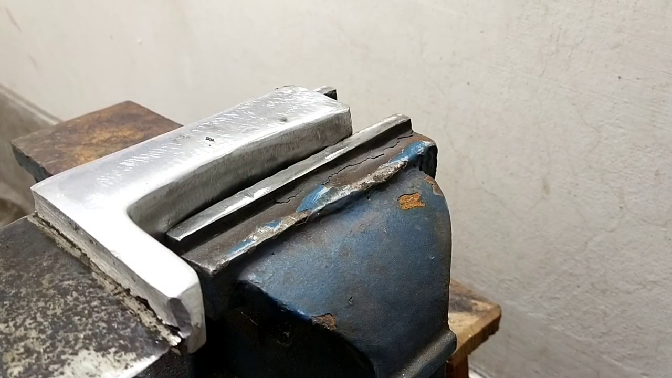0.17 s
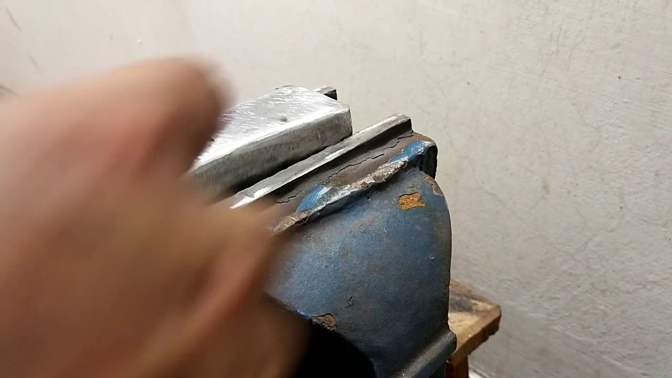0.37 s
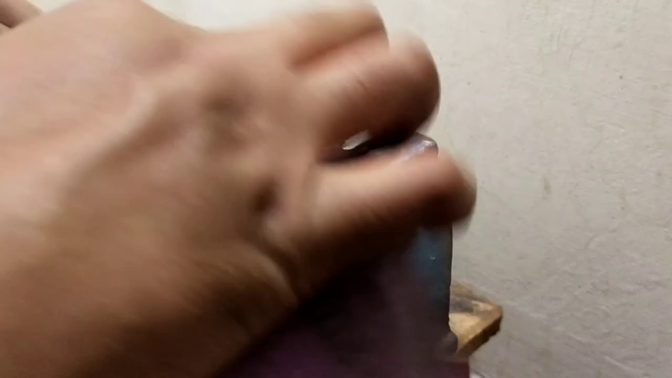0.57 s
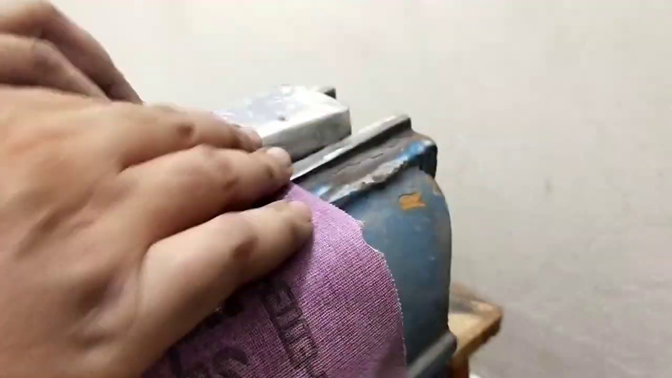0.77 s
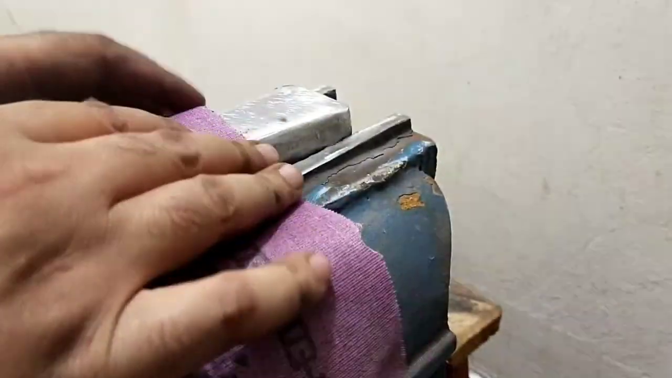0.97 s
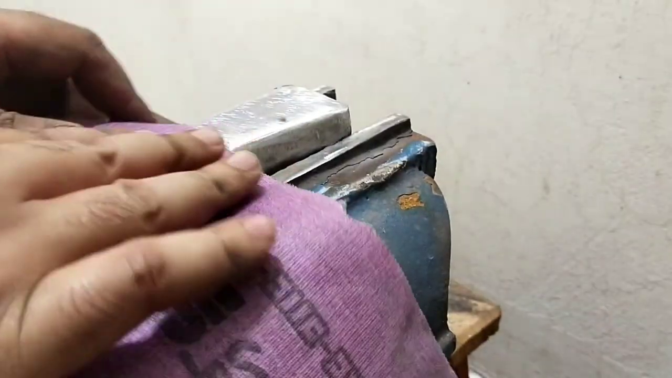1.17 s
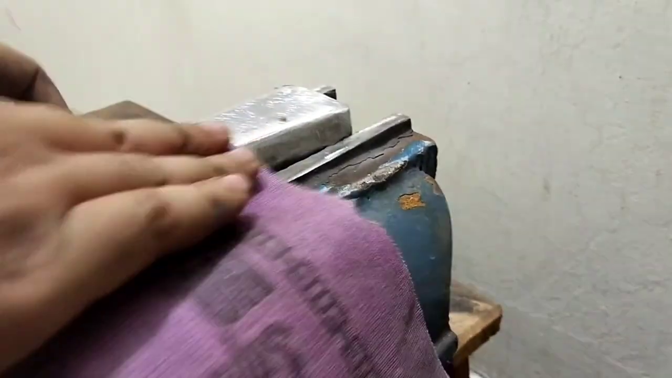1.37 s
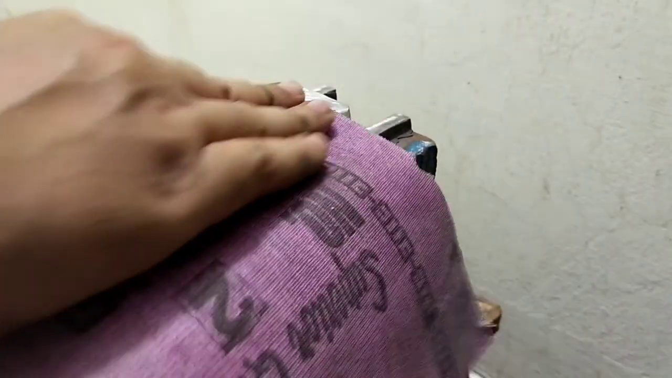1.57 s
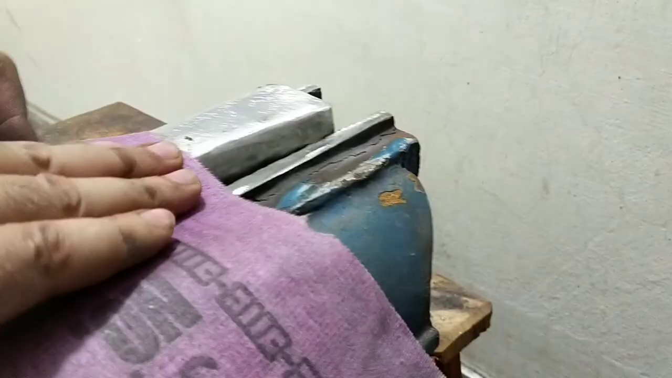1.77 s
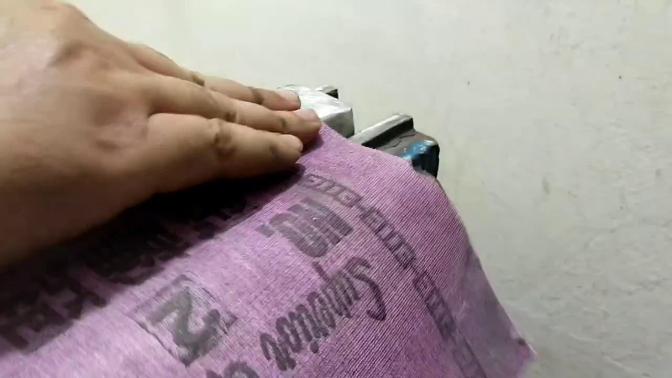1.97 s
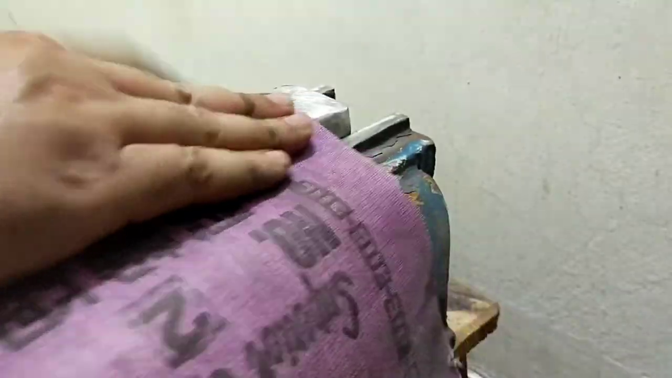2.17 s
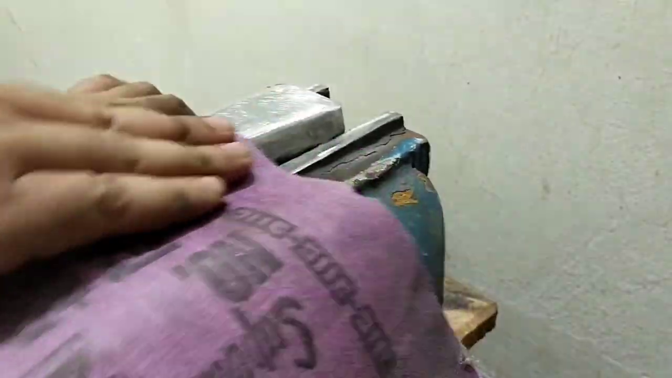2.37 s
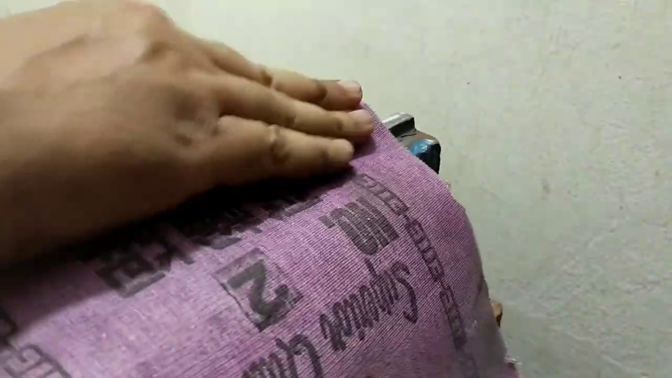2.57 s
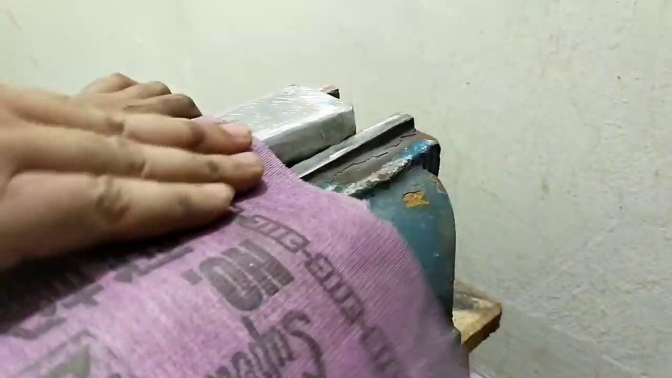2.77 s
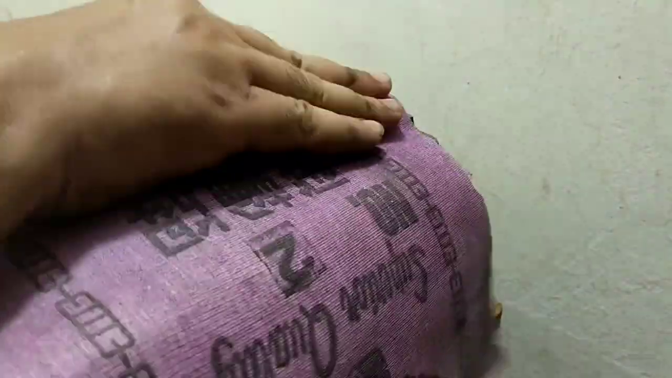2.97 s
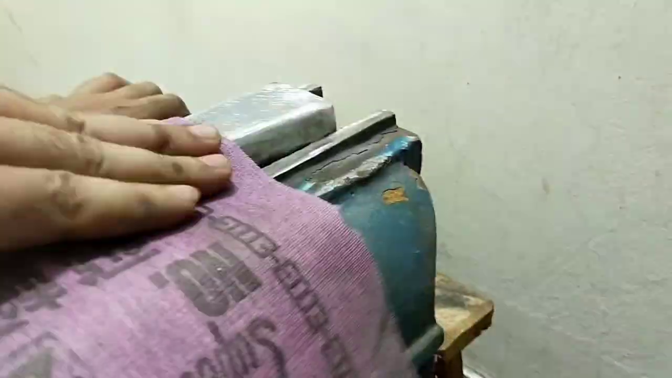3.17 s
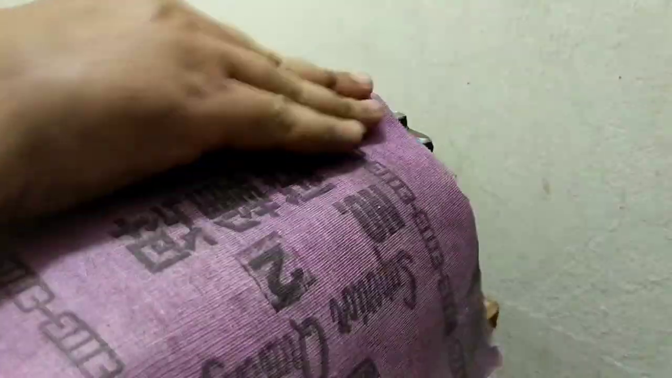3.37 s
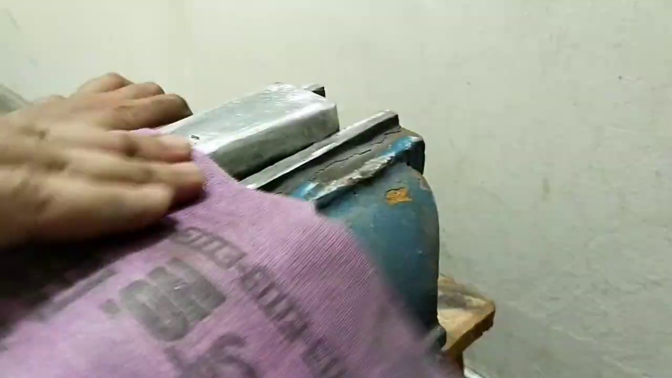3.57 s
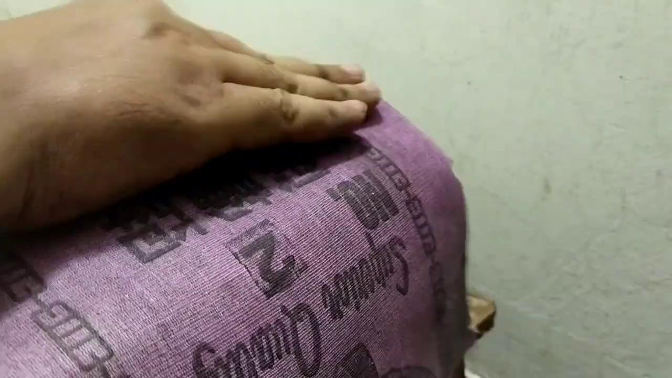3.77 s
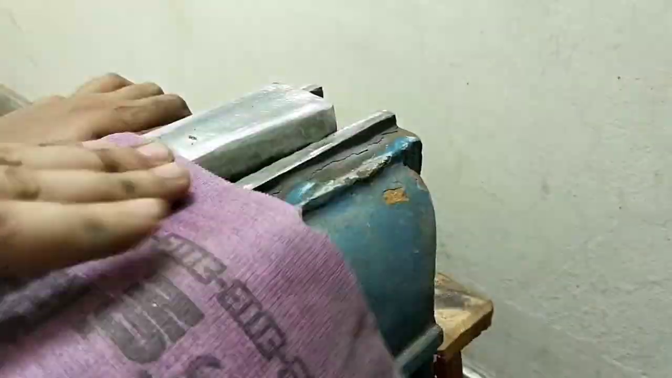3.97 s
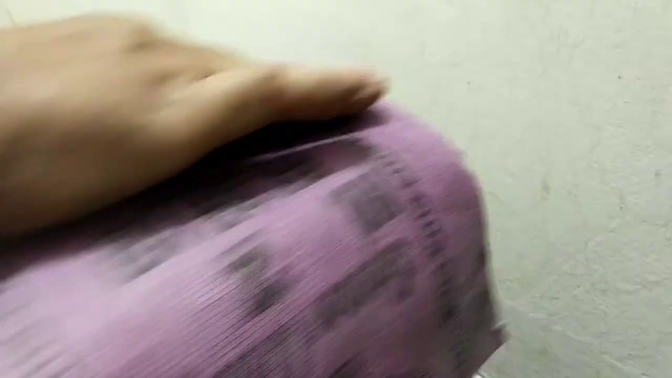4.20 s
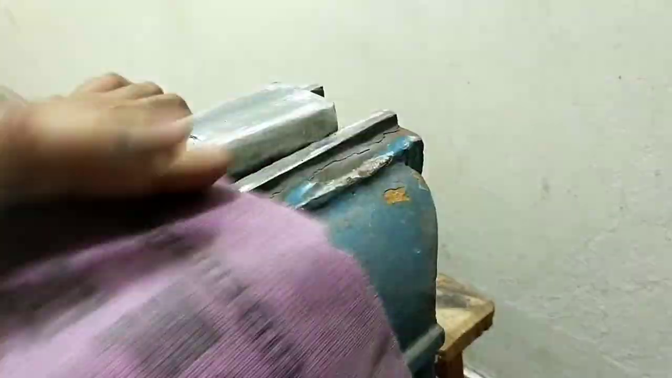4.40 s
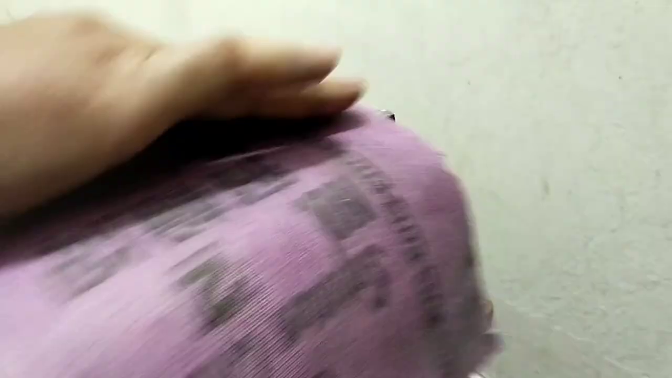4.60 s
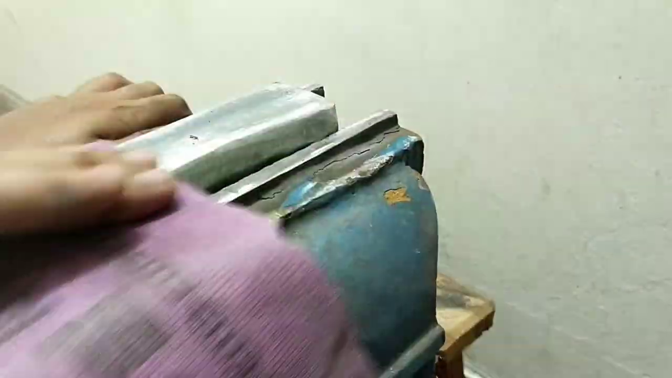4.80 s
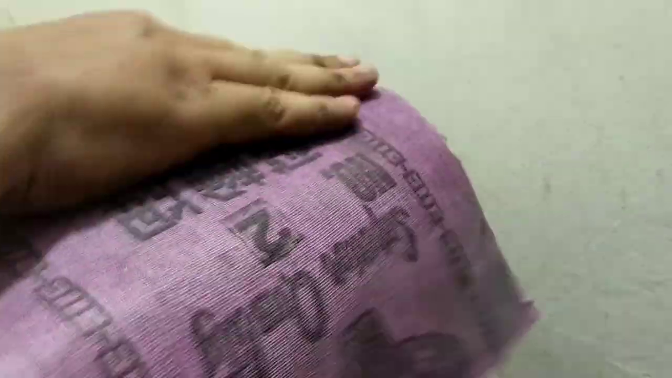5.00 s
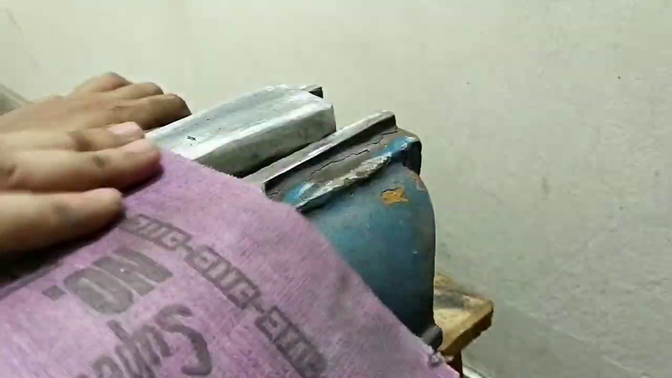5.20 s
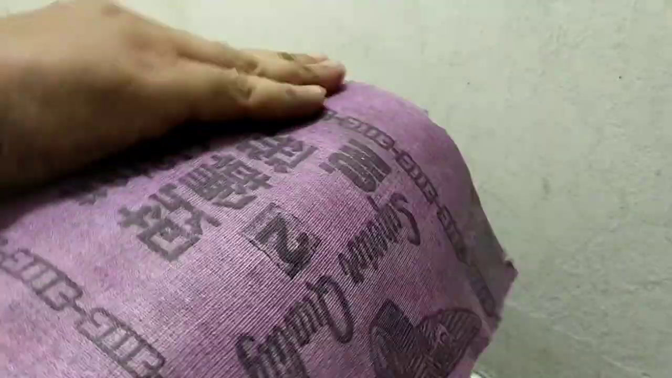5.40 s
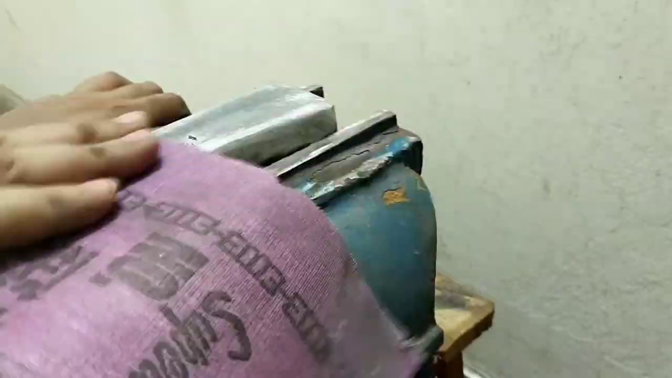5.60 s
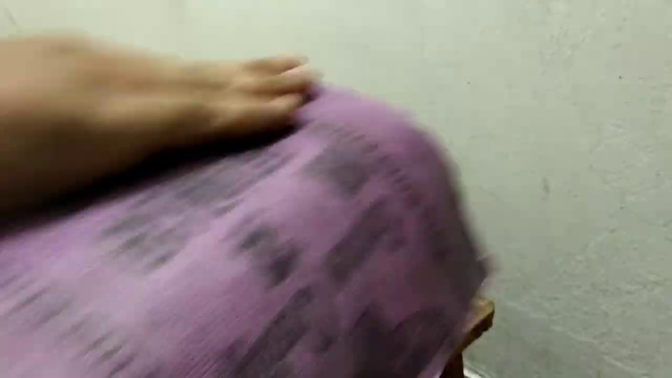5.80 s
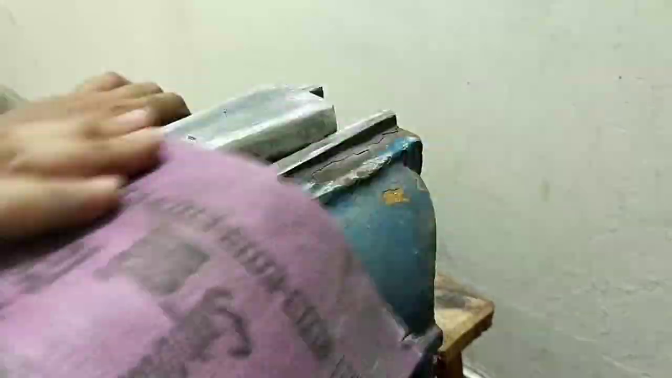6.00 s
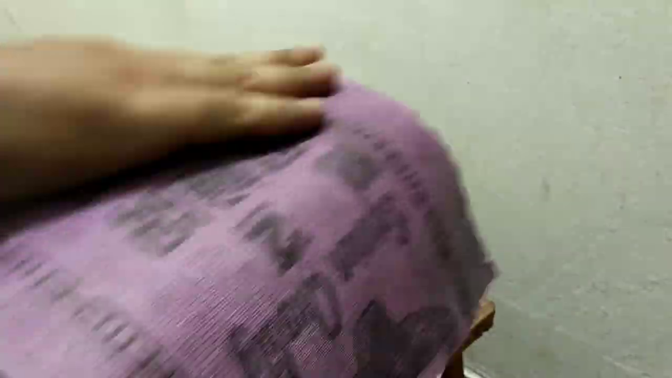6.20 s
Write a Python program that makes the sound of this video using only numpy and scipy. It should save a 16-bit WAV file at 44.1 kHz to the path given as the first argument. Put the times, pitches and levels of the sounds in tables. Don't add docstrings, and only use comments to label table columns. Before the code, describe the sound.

Close stereo pickup in a small bare workshop. Stiff abrasive cloth is laid over a metal bar with light scuffs, crackles and dull bench knocks. After a short quiet gap, the hand begins rubbing: rough, bright, gritty strokes, about five per second, growing stronger and then staying steady to the end. Sharp creases snap at some turns, the bar rings faintly, and a low hum sits beneath.

```python
import sys
import numpy as np
from scipy import signal
from scipy.fft import rfft, irfft, next_fast_len
from scipy.io import wavfile
from scipy.ndimage import uniform_filter1d

SR = 44100
rng = np.random.default_rng(int(sys.argv[2]) if len(sys.argv) > 2 else 0)


def how_loud(loudness_db):
    steps = np.asarray(loudness_db, float) / 20
    return 10 ** steps


def persist_wave(psi):
    counts = np.round(np.clip(psi, -1, 1) * 32767).astype(np.int16)
    wavfile.write(sys.argv[1], SR, np.atleast_2d(counts).T)


N = 275625
T = np.arange(N) / SR
SIZE = next_fast_len(N + SR // 2)
HZ = np.fft.rfftfreq(SIZE, 1 / SR) + 1

# start_s, force_db, lean_db (towards the end), ring_db (of the bar), cup_db (of the palm)
STROKES = [(1.381, -17.5, 2, 0.5, 0), (1.61, -15, -0.5, -19, -1.5), (1.822, -17, -2.5, 3.5, 6),
           (2.202, -19, 1.5, -4, -5), (2.402, -14.5, 1, 1, 0.5), (2.636, -13, -1, -1.5, 1),
           (2.831, -10.5, 0, 4.5, -3), (3.049, -10, 0.5, 3.5, 4), (3.248, -10, -0.5, 4, 2),
           (3.424, -8, 0, -4.5, -1), (3.619, -10, -1, -3, -0.5), (3.812, -8.5, -1, -10, -4),
           (4.009, -11, 1.5, -2, 0), (4.216, -12.5, 0.5, -13, -4), (4.436, -9.5, -1, -5, -0.5),
           (4.624, -9.5, -1.5, -11, -2), (4.831, -12, 0.5, 2.5, 1.5), (5.051, -9.5, 0.5, -3.5, 1),
           (5.273, -9.5, -2, -5, -2), (5.484, -8.5, 0.5, -5, -1), (5.688, -9.5, -1, 4.5, 1.5),
           (5.888, -9.5, 0, 2.5, 3), (6.097, -10.5, -1.5, 6.5, 4.5)]
# fullest_s, level_db, rise_s,
# fade_db_per_s, cup_db (of the palm)
DRAGS = [(.24, -39, .03, 500, 14), (0.337, -26, 0.0082, 92, 4.5), (0.417, -20, .003, 101, 3),
         (.585, -28, 0.091, 113, 2), (.648, -33.5, 0.04, 165, 9.5), (0.737, -26.5, 0.02, 219, 8),
         (.803, -36.5, 0.008, 126, 11), (1.11, -32.5, 0.14, 75, 9), (1.31, -39.5, 0.015, 90, 19),
         (1.791, -30, 0.049, 200, 14), (1.98, -29.5, 0.0068, 132, 10.5)]
FIRST_STROKE_S = STROKES[0][0]


def rms_one(x):
    return x / np.sqrt(np.mean(x ** 2) + 1e-20)


def peak(x):
    return abs(x).max(axis=-1, keepdims=True)


def in_time(rows):
    s, *columns = np.transpose(rows)
    return [np.interp(T, s, c, left=c[0], right=c[-1]) for c in columns]


def at_hz(points, hz):
    point_hz, point_db = np.transpose(points)
    return np.interp(np.log(hz), np.log(point_hz), point_db)


def drift(rate_hz):
    r = np.exp(-80 * np.pi * rate_hz / SR)
    slow = signal.lfilter([1], [1, -2 * r, r * r], rng.standard_normal(N // 40 + 2002))[2000:]
    return np.interp(np.arange(N) / 40, np.arange(len(slow)), rms_one(slow))


def background():
    # time_s, level_db
    hum_level = [(0, -42.5), (.75, -41.5), (.9, -56.5), (1.4, -52), (1.9, -46), (2.3, -52.5), (2.65, -36),
                 (3.1, -47), (4.7, -50.5), (5.15, -38.5), (5.8, -53), (6.25, -35)]
    # time_s, level_db
    whine_level = [(0, -66), (.9, -59.5), (1.05, -68), (6.25, -85)]
    # pitch_hz, level_db (per Hz)
    air_colour = [(100, -48), (250, 1), (550, -3), (1200, -8), (1480, -2), (1700, -4), (2600, -13.5),
                  (3400, -16), (6800, -24), (15500, -25)]
    # time_s, level_db
    air_fade = [(0, 0), (1.4, 0), (1.9, -13), (6.25, -13)]
    hum_hz, hum_width_hz, hum_waver_db = 101, 5, 2.5
    whine_hz, whine_waver_db, air_db = 2745, 2.5, -51
    white = rng.standard_normal((3, N))

    r, turn = np.exp(-np.pi * hum_width_hz / SR), 2 * np.pi * hum_hz / SR
    line = rms_one(signal.lfilter([1, 0, -1], [1, -2 * r * np.cos(turn), r * r], white[0]))
    line = 0.52 * line + 0.73 * np.sin(turn * np.arange(N))
    rumble_band = signal.butter(2, [85, 190], "band", fs=SR, output="sos")
    backwards = white[:, ::-1]
    rumble = rms_one(signal.sosfilt(rumble_band, 0.66 * backwards[0] + 0.41 * backwards[1:]))
    hum = how_loud(in_time(hum_level)[0] + hum_waver_db * drift(4.5)) * (0.45 * line + 0.45 * rumble)

    whine = how_loud(in_time(whine_level)[0] + whine_waver_db * drift(11.0)) * np.sin(2 * np.pi * whine_hz * T)

    alike = 1 / (1 + (HZ / 400) ** 2)
    air = np.sqrt(alike) * rfft(white[0], SIZE) + np.sqrt(1 - alike) * rfft(white[1:], SIZE)
    air = rms_one(irfft(air * how_loud(at_hz(air_colour, HZ)), SIZE)[:, :N])
    return hum + whine + how_loud(air_db + in_time(air_fade)[0]) * air


def rubbing():
    resting_db = -55
    rest_s, longest_s = 0.031, 0.1994
    speed_up, slow_down = .35, 0.52
    power = how_loud(resting_db) ** 2 * (T < FIRST_STROKE_S)
    turns = [row[0] for row in STROKES[1:]] + [np.inf]
    for (start, force_db, lean_db, *_), turn in zip(STROKES, turns):
        along = np.clip((T - start) / min(turn - rest_s - start, longest_s), 0, 1)
        faster = np.sin(np.pi / 2 * np.clip(along / speed_up, 0, 1))
        slower = np.sin(np.pi / 2 * np.clip((1 - along) / slow_down, 0, 1))
        push = how_loud(force_db + lean_db * (4.63 * along - 2))
        power = power + (push * faster * slower) ** 2
    for s, level_db, rise, fade_db, _ in DRAGS:
        onset = np.clip(1 + (T - s) / rise, 0, 1) ** 2
        fade = how_loud(level_db - fade_db * np.maximum(T - s, 0))
        power += (onset * fade) ** 2
    return np.sqrt(power)


def grains():
    grains_per_s, spread_db = 9000, 1.5
    crackles_per_s, crackle_db = 40, 9
    lag_s, lag_spread_s = .00015, .00014
    born, grain_size = rng.random(N), rng.exponential(1, N)
    sign, place = rng.choice([-1, 1], N), rng.standard_normal(N)
    clicks = (born < grains_per_s / SR) * sign * how_loud(spread_db * np.minimum(grain_size, 6))
    clicks *= how_loud(crackle_db * (born < crackles_per_s / SR))
    late = np.arange(N) + np.clip(lag_s + lag_spread_s * place, -.001, .001) * SR + 50
    whole, part = late.astype(int), late % 1
    left = np.bincount(whole + (part > .5), clicks, N + 200)[50:N + 50]
    flutter_db = 1.22 * drift(39.0) + 0.73 * drift(130)
    return rms_one(np.array([left, clicks])) * how_loud(flutter_db)


def palm():
    loose_bar_db, loose_fine_db = 6, -1.5
    fine_db, fine_per_cup = 4.57, 0.11
    grips = [(s - rise, cup_db, loose_bar_db * (s < FIRST_STROKE_S), loose_fine_db)
             for s, _, rise, _, cup_db in DRAGS]
    grips += [(s, cup_db, ring_db, fine_db + fine_per_cup * cup_db)
              for s, _, _, ring_db, cup_db in STROKES]
    grips = np.array(sorted(grips))
    current = np.maximum(np.searchsorted(grips[:, 0], T) - 1, 0)
    return uniform_filter1d(grips[current, 1:], size=1000, axis=0).T


def sanding():
    # pitch_hz, level_db (per Hz)
    grit_colour = [(60, -54), (100, -18), (200, -6.5), (300, -10.5), (450, -5.5), (800, -4.5), (1100, 0),
                   (1500, 1.8), (3000, 2.5), (5700, -1), (6800, -1), (9000, -9), (12000, -10.5),
                   (15500, -8.5)]
    # pitch_hz, width_hz, level_db
    resonances = [(412, 180, 4), (614.5, 17, 7), (753, 180, 6), (855, 46, 1), (868, 16, 5), (1640, 38, -8),
                  (2500, 560, 2), (3960, 68, 3), (6950, 670, 3)]
    # pitch_hz, left_minus_right_db
    port_difference = [(60, 19), (150, 0), (380, -2), (950, -2), (2380, -2), (5980, -2), (15000, 4.5)]
    # time_s, left_minus_right_db, fine_grit_db
    hand_place = [(0, 2, -5), (.2, -11, 0.5), (.45, 2, 1.5), (1.4, 1.5, 2.5), (2.3, 0.5, -1), (3.4, 3, 1),
                  (4.0, 0.5, 1), (4.6, 1, 2), (4.93, 5, 2.5), (5.6, 2.5, -1), (6.25, 4, 1.5)]
    main_ring_hz, ring_width_hz, main_ring_db = 1562, 300, 0.5
    loose_ring_db = -9
    fullness_db, ring_db, fine_db = palm()
    pan_db, fresh_db = in_time(hand_place)
    side = np.array([[.5], [-.5]])

    colour_db = at_hz(grit_colour, HZ)
    for hz, width_hz, db in resonances:
        colour_db = colour_db + db / (1 + (2 * (HZ - hz) / width_hz) ** 2)
    colour = how_loud(colour_db + side * at_hz(port_difference, HZ))
    colour /= np.sqrt(np.mean(colour[:, (HZ > 1000) & (HZ < 12000)] ** 2) / 2)
    spectrum = rfft(grains() * rubbing(), SIZE) * colour / 2

    ring = spectrum / (1 + 1j * (HZ ** 2 - main_ring_hz ** 2) / HZ / ring_width_hz)
    ring_gain_db = main_ring_db + ring_db + loose_ring_db * (T < FIRST_STROKE_S)
    out = how_loud(ring_gain_db) * irfft(ring, SIZE)[:, :N]

    octave = np.log2(np.clip(HZ, 120, 15360) / 120)
    for k in range(15):
        hz = 120 * 2 ** (k / 2)
        band = np.clip(1 - abs(2 * octave - k), 0, 1)
        low = 1 / (1 + (hz / 800) ** 4)
        high = 1 / (1 + (5500 / hz) ** 4)
        patch_db = .9 * drift(5) + 2.1 * drift(16.6)
        gain_db = low * fullness_db + high * (fine_db + fresh_db) + (1 - low) * side * pan_db + patch_db
        out += how_loud(gain_db) * irfft(spectrum * band, SIZE)[:, :N]
    return out


def knocks():
    # start_s, peak_db, pitch_hz
    bench_knocks = [
        (0.1753, -22, 156),
        (.42, -26, 201),
        (0.742, -29, 129),
        (2.464, -17.5, 412),
    ]
    low_t60_s, high_t60_s, rise_s = 0.033, 0.018, 0.00067
    out, t = np.zeros(N), np.arange(4000) / SR
    for s, db, hz in bench_knocks:
        thud = np.sin(2 * np.pi * hz * t) * how_loud(-60 * t / low_t60_s)
        thud += 0.41 * np.sin(2 * np.pi * 2.6 * hz * t) * how_loud(-60 * t / high_t60_s)
        out[round(s * SR):][:len(t)] += how_loud(db) * thud * np.minimum(t / rise_s, 1)
    return out


def snaps():
    # start_s, dull_peak_db, sharp_peak_db
    laying_snaps = [(0.223, -35, -46), (0.3388, -13.5, -24), (0.359, -18, -21), (0.4217, -11.5, -11.5),
                    (0.649, -18, -29), (0.6852, -42, -30), (0.7286, -21, -32), (0.7554, -19, -35),
                    (0.802, -29, -32), (0.989, -34, -55), (1.1412, -44, -23), (1.1962, -23, -27),
                    (1.2387, -43, -23), (1.31, -38, -40)]
    # start_s, dull_peak_db, sharp_peak_db
    rubbing_snaps = [(1.3987, -24, -30), (1.6319, -17, -16), (1.9057, -4, -14), (2.1536, -34.5, -50),
                     (2.2185, -34, -26), (2.2574, -22, -7), (2.297, -30, -11), (2.3121, -10, -27),
                     (2.328, -12, -28), (2.4189, -9, -11), (2.5343, -24, -10), (2.647, -11, -31),
                     (2.654, -4.5, -13), (2.695, -10, -21), (2.839, -9, -18), (3.062, -16, -25),
                     (3.2572, -6, -24), (3.433, -24, -33), (4.232, -5, -10), (4.434, -16, -25),
                     (4.6268, -5.5, -34), (4.7512, -12, -19), (4.856, -5, -32), (5.2837, -18, -12),
                     (5.486, -14, -23)]
    t60_s, rise_s = 0.0072, .0005
    out, t = np.zeros((2, N)), np.arange(2000) / SR
    rows = laying_snaps + rubbing_snaps
    noise = rng.standard_normal((len(rows), 2, len(t)))
    dull_band = signal.butter(2, [900, 6000], "band", fs=SR, output="sos")
    sharp_band = signal.butter(2, 6000, "high", fs=SR, output="sos")
    for (s, dull_db, sharp_db), burst in zip(rows, noise):
        burst = burst + burst[::-1] / 2
        burst = burst * how_loud(-60 * t / t60_s) * np.minimum(t / rise_s, 1)
        dull, sharp = signal.sosfilt(dull_band, burst), signal.sosfilt(sharp_band, burst)
        snap = how_loud(dull_db - 1) * dull / peak(dull) + how_loud(sharp_db + 3) * sharp / peak(sharp)
        out[:, round(s * SR):][:, :len(t)] += snap
    return out


def workshop(x, count=4):
    t60_s, echo_db, wall_cut_hz = 0.47, -6, 5100
    t = np.arange(SR // 2) / SR
    spots = np.array([drift(4.7) for k in range(count)])
    spots /= np.sqrt(np.sum(spots ** 2, axis=0))
    dying = how_loud(-60 * t / t60_s) * (t > .004)
    tails = rfft(rng.standard_normal((count, 3, len(t))) * dying, SIZE)
    alike = 1 / (1 + (HZ / 1300) ** 3)
    echo = np.sqrt(alike) * tails[:, :1] + np.sqrt(1 - alike) * tails[:, 1:]
    echo = echo / np.sqrt(1 + (HZ / wall_cut_hz) ** 2)
    echo /= np.sqrt(np.mean(abs(tails) ** 2))
    heard = np.sum(rfft(x.mean(axis=0) * spots, SIZE)[:, None] * echo, axis=0)
    return how_loud(echo_db) * irfft(heard, SIZE)[:, :N]


def scene():
    bench = sanding() + snaps() + knocks()
    return bench + workshop(bench) + background()


def roll_off(x):
    return signal.sosfilt(signal.butter(12, 16620, fs=SR, output="sos"), x)


def record(dry):
    ceiling, low_cut_hz, top_hz = .77, 80, 15540
    x = ceiling * np.tanh(dry / ceiling)
    x = signal.sosfilt(signal.butter(3, low_cut_hz, "high", fs=SR, output="sos"), x)
    x = signal.sosfilt(signal.ellip(10, .5, 60, top_hz, fs=SR, output="sos"), x)
    return roll_off(x)


dry = scene()
out = record(dry)
persist_wave(out)
```